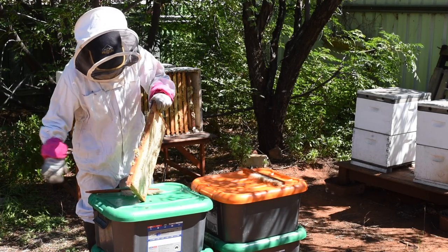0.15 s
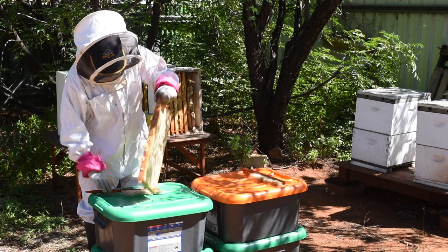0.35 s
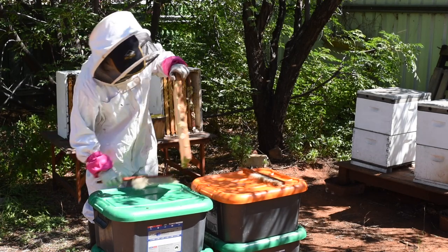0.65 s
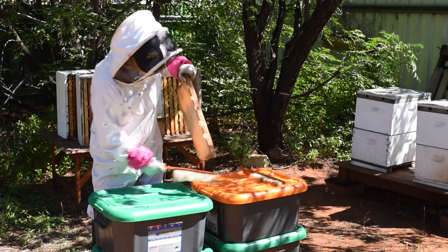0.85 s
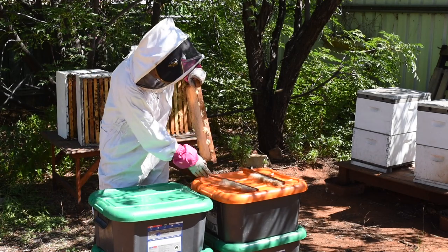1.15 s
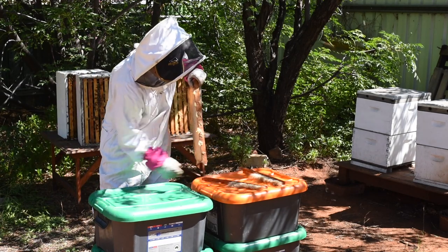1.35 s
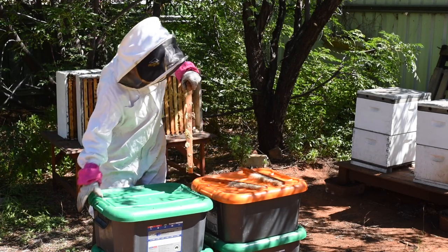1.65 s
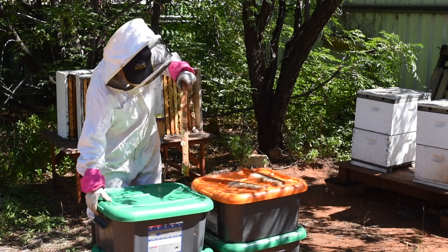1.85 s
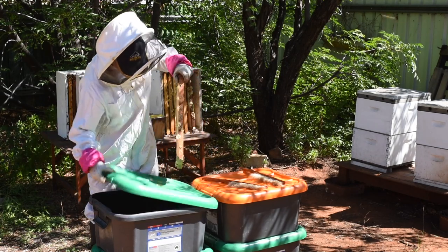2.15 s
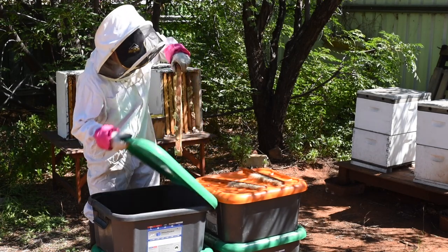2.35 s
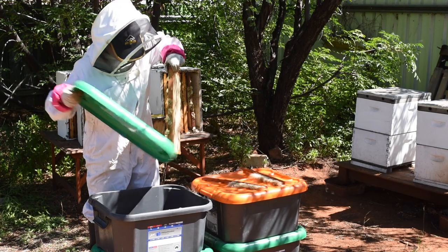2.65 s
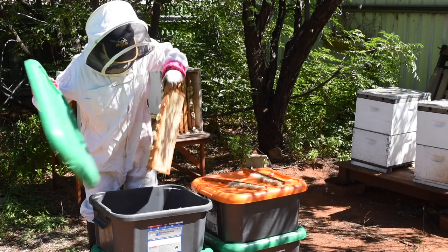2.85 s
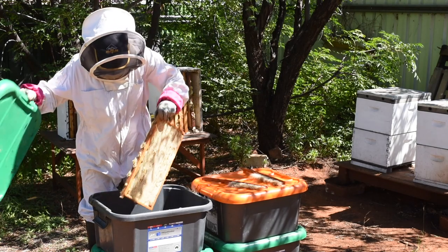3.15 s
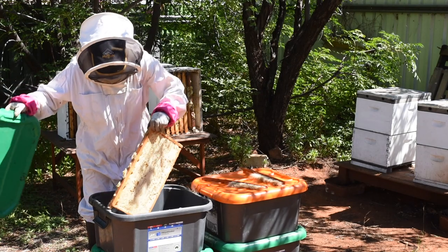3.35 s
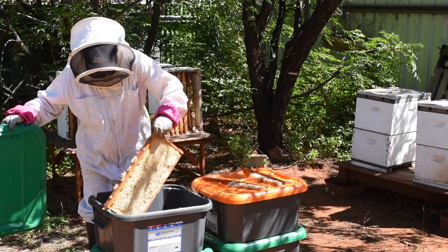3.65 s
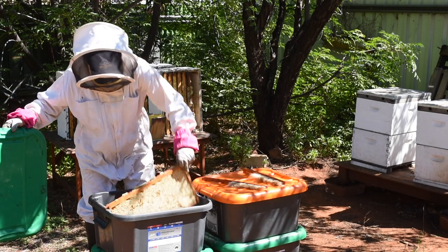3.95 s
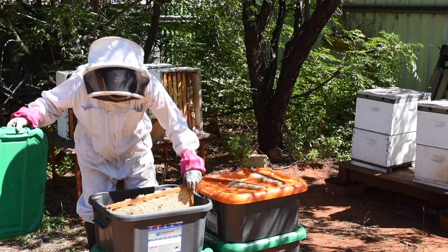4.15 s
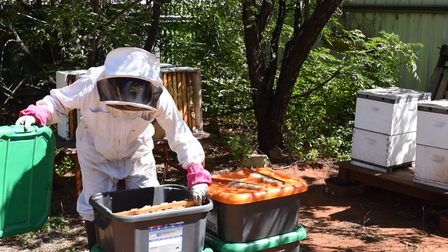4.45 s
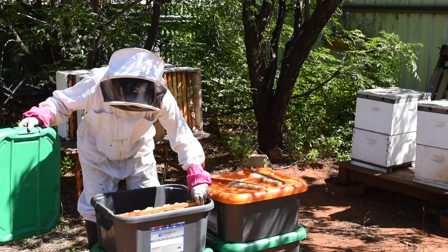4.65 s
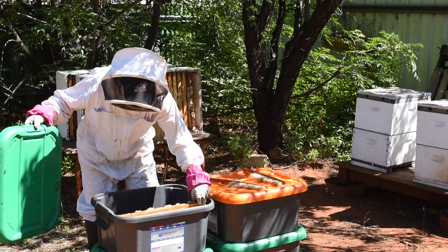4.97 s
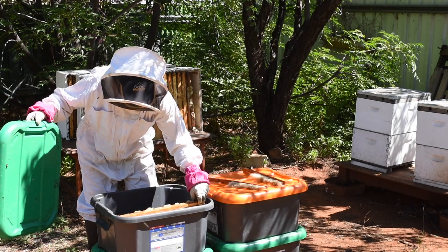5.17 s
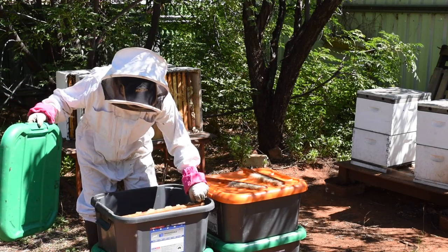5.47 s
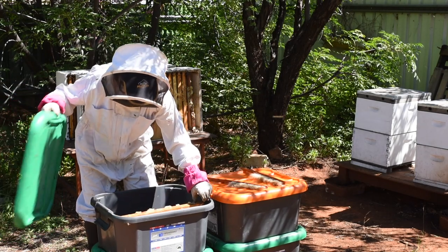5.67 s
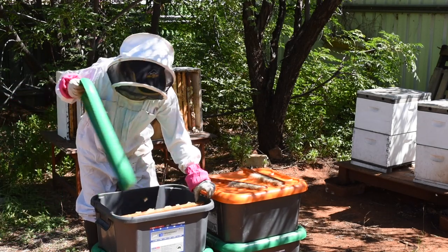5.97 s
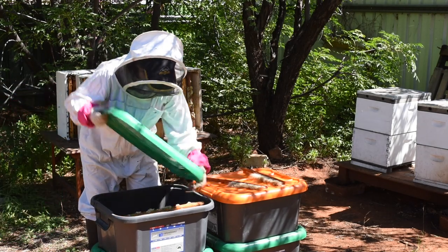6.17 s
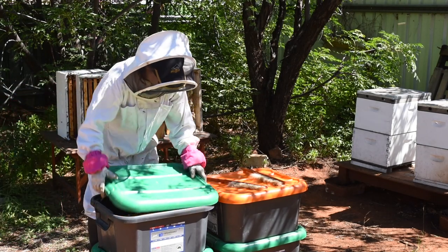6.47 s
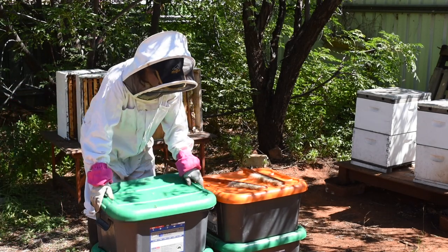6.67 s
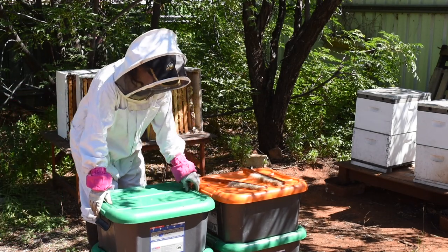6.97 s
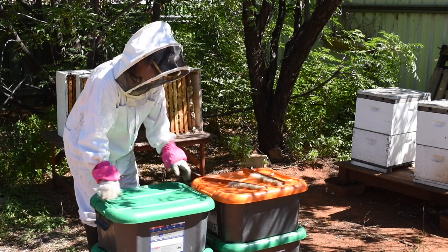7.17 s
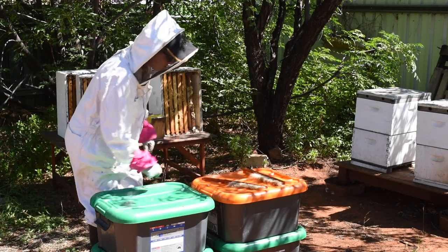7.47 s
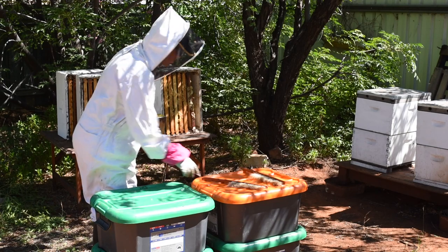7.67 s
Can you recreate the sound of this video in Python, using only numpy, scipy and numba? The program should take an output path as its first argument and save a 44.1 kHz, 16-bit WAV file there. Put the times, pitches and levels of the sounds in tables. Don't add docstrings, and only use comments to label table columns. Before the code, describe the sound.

Bees hum steadily around an outdoor yard while a brush clatters onto a plastic lid, a wooden frame thuds into a tub, and the lid snaps shut.

```python
import sys
import numpy as np
from scipy import signal
from scipy.fft import rfft, irfft, next_fast_len
from scipy.io import wavfile
from scipy.ndimage import uniform_filter1d
from numba import njit

SR = 44100
rng = np.random.default_rng(int(sys.argv[2]) if len(sys.argv) > 2 else 0)


def convert_level_to_amplitude(level_db):
    exponent = np.asarray(level_db, float) / 20
    return 10 ** exponent


def pcm_store(signal):
    levels = np.round(np.clip(np.atleast_2d(signal), -1, 1) * 32767)
    wavfile.write(sys.argv[1], SR, levels.astype(np.int16).T)


N = 344862


def level(x, db):
    return x * convert_level_to_amplitude(db) / np.sqrt(np.mean(x ** 2))


def peak(x, db):
    return x * convert_level_to_amplitude(db) / np.sqrt(uniform_filter1d(x ** 2, 200).max())


def colour(x, table):
    hz, db = np.transpose(table)
    size = next_fast_len(len(x))
    log_hz = np.log(np.arange(size // 2 + 1) * SR / size + 1)
    gain = convert_level_to_amplitude(np.interp(log_hz, np.log(hz), db))
    return irfft(rfft(x, size) * gain, size)[:len(x)]


def band(x, lo_hz, hi_hz):
    return signal.sosfilt(signal.butter(2, [lo_hz, hi_hz], "band", fs=SR, output="sos"), x)


def walk(rate_hz, count):
    knots = rng.standard_normal((count, 200))
    at = np.arange(0, N + 64, 64) / SR * rate_hz
    rows = [np.interp(at, np.arange(200), k) for k in knots]
    return 1.3 * uniform_filter1d(rows, max(int(SR / 64 / rate_hz), 1), axis=1)


def knocks(blows, wall, contact_ms, damp_s, crack_db, crack_per_hardness, rebound_db):
    rebound_s = 0.046
    out = np.zeros(N + SR)
    t = np.arange(SR // 5, dtype=np.float32) / SR
    rank = np.arange(96)[:, None] + rng.uniform(-.4, .4, (96, 1))
    hz = 100 + 9.01 * rank + .38 * rank ** 2
    family = np.digitize(hz[:, 0], (300, 900))
    wall_hz, wall_db = np.transpose(wall)
    mode_db = np.interp(np.log(hz), np.log(wall_hz), wall_db)
    touch = np.exp(-t / contact_ms * 1000)
    fade = np.exp(t * np.float32(-np.log(1000) / damp_s * (hz / 400) ** 0.74))
    gaps = np.diff(np.array(blows)[:, 0], prepend=-1)
    for gap, (start_s, blow_db, heft_db, hard_db) in zip(gaps, blows):
        chance = rng.standard_normal((3, len(hz), 1))
        grit = rng.standard_normal((3, len(t)))
        grit[:2, 0] = 10.3
        rings = np.float32(convert_level_to_amplitude(mode_db + 1.43 * chance[0]) * np.sign(chance[2])) * fade
        rings *= np.sin(np.float32(2 * np.pi * hz * (1 + 0.021 * chance[1])) * t)

        crack = colour(grit[2], wall) * (touch + 0.097 * np.exp(-np.log(1000) * t / (1.2 * damp_s)))
        crack[:2] += 0.57 * np.abs(crack).max() * (gap > rebound_s)
        total_crack_db = blow_db + rebound_db * (gap < rebound_s) + crack_db + crack_per_hardness * hard_db
        sound = peak(band(crack, 2460, 16000), total_crack_db)

        pushes = t * np.exp(-t / 0.00039), grit[0] * touch, grit[1] * touch
        for k, part_db in enumerate((heft_db, 0, hard_db)):
            rung = signal.fftconvolve(rings[family == k].sum(axis=0), pushes[k][:999])
            sound = sound + peak(rung[:len(t)], blow_db + part_db - 5.0)
        i = int(start_s * SR)
        out[i:i + len(t)] += sound
    return out[:N]


# start in seconds, strength in dB, heft in dB (high = mid-panel), hardness in dB (high = edge on edge).
BRUSH_BLOWS = [(0.473, -37, 3.5, -6), (0.894, -43, -18, -14), (1.166, -22, 1, -0.5), (1.181, -28, -8, 3.5),
               (1.212, -36.5, -5, 3), (1.278, -14.5, 2, 6), (1.298, -30, -4, 14.5), (1.341, -24.5, -5, 3),
               (1.379, -30, 3.5, -5), (1.57, -45, -19, -15)]
# frequency in Hz, gain in dB.
FAR_LID_MODES = [(53, -38), (90, -24), (155, -6), (324, -18.5), (649, -5), (880, -9), (1070, -10),
                 (1390, 2), (1800, -9), (3770, -14), (4290, -14.5), (5000, -15.5), (11200, -26),
                 (13600, -49), (16100, -57)]


def brush_on_far_lid():
    return knocks(BRUSH_BLOWS, FAR_LID_MODES, contact_ms=0.42, damp_s=0.13,
                  crack_db=-8, crack_per_hardness=1.64, rebound_db=-14.5)


# start in seconds, strength, heft and hardness in dB.
PRISE_BLOWS = [(2.175, -37, 10, -20), (2.193, -27.5, 6.5, -7), (2.222, -17.5, -4, -6.5),
               (2.239, -20, 4, -10), (2.256, -33, 11, -1), (2.273, -43, -2, 11), (2.32, -47, 12, 2),
               (2.365, -36.5, 11, 2), (2.406, -32.5, 4, 0), (2.423, -23, -14, -12), (2.448, -20.5, -8, -8),
               (2.46, -19, -4, -9), (2.471, -34.5, 11, 12), (2.489, -25.5, 0, -16), (2.536, -43, 4, -6),
               (2.638, -38, -1, -18)]
# frequency in Hz, gain in dB.
LOOSE_LID_MODES = [(53, -41), (90, -17), (210, 0), (372, -12.5), (713, -7), (977, -19), (1190, -13.5),
                   (1840, -21.5), (2030, -25), (3010, -28.5), (10000, -38), (13000, -79), (22000, -120)]


def prise_lid_off():
    return knocks(PRISE_BLOWS, LOOSE_LID_MODES, contact_ms=3.0, damp_s=0.12,
                  crack_db=-19, crack_per_hardness=.8, rebound_db=-1)


# start in seconds, strength, heft and hardness in dB.
GUIDE_BLOWS = [(3.471, -34, 5.5, -20), (3.595, -27.5, -0.5, -12), (3.606, -26.5, -13, -6.5),
               (3.619, -38, 16.5, -16), (3.64, -56, 7, -8), (3.921, -27, 6, -10), (3.94, -47, -3, 15.5),
               (3.961, -50, 19, -17), (3.989, -45, 14, -14)]
# frequency in Hz, gain in dB.
HOLLOW_TUB_MODES = [(53, -36), (90, -16), (124, 3), (174, -6.5), (253, 4.5), (354, -14), (436, -5),
                    (1010, -17), (1420, -18), (2740, -28), (8000, -50), (10400, -76), (17600, -120)]


def guide_frame_in():
    return knocks(GUIDE_BLOWS, HOLLOW_TUB_MODES, contact_ms=2.2, damp_s=0.09,
                  crack_db=-27, crack_per_hardness=1.0, rebound_db=3)


# start in seconds, strength, heft and hardness in dB.
DROP_BLOWS = [(4.535, -9, -11, -3.5), (4.543, -11, 5.5, 4), (4.556, -14.5, 1, -9), (4.565, -11.5, -2, -2.5),
              (4.581, -26, 6, -2), (4.597, -27, -10, 1), (4.613, -10, 0.5, -5), (4.634, -29, 15.5, 3),
              (4.654, -34, 3, -6), (4.697, -30.5, -5, -4), (4.807, -37, -1, 8.5)]
# frequency in Hz, gain in dB.
FRAME_IN_TUB_MODES = [(53, -34), (90, -8), (205, -6.5), (304, -7.5), (369, -9), (558, -10), (861, -10.5),
                      (960, -11), (1220, -12), (1760, -18), (2140, -18.5), (3610, -26), (8410, -29.5),
                      (16100, -48)]


def drop_frame():
    return knocks(DROP_BLOWS, FRAME_IN_TUB_MODES, contact_ms=5.0, damp_s=0.099,
                  crack_db=-15.5, crack_per_hardness=1.25, rebound_db=1.5)


# start in seconds, strength, heft and hardness in dB.
SETTLE_BLOWS = [(5.268, -26.5, 4, 2), (5.278, -26, -9, 2), (5.34, -29.5, -5, -3.5),
                (5.433, -27.5, 2.5, -15), (5.454, -13, -11, -6), (5.472, -27, 2.5, -8),
                (5.751, -36, -1.5, -19), (6.297, -29.5, -28, -1)]
# frequency in Hz, gain in dB.
FRAME_ON_RIM_MODES = [(53, -40), (90, -25), (173, -9), (385, -6), (482, -16), (629, 2), (741, -6),
                      (891, -8), (1820, -18), (4880, -20.5), (6110, -23), (12000, -34), (15600, -71),
                      (22000, -120)]


def settle_frame():
    return knocks(SETTLE_BLOWS, FRAME_ON_RIM_MODES, contact_ms=2.3, damp_s=0.079,
                  crack_db=-11, crack_per_hardness=0.7, rebound_db=-7.5)


# start in seconds, strength, heft and hardness in dB.
PRESS_BLOWS = [(6.565, -13, -8, 1.5), (6.595, -23.5, -2, 1.5), (6.671, -14.5, -9.5, 5),
               (6.757, -24.5, -17, -16), (6.777, -23, -22, -7), (6.899, -27, 1, 2), (7.036, -27.5, 1, -9),
               (7.073, -30.5, 3, -8), (7.477, -38.5, -5, -11)]
# start in seconds, strength, heft and hardness in dB.
SNAP_BLOWS = [
    (6.715, -22, -1, 2),
    (6.808, -18, -1, -0.5),
    (6.872, -12, -2, -4.5),
    (7.052, -22.5, 3.5, -8.5),
]
# frequency in Hz, gain in dB.
SEATED_LID_MODES = [(53, -36), (90, -9.5), (196, 2.5), (482, -13.5), (617, -4), (1120, -2.5), (1490, 4),
                    (1650, -5), (1820, 1), (2150, -3.5), (3040, -4.5), (3510, -21.5), (5510, -6),
                    (6230, -20), (12000, -53), (15600, -81), (22000, -120)]


def press_lid_on():
    thumps = knocks(PRESS_BLOWS, SEATED_LID_MODES, contact_ms=1.6, damp_s=0.12,
                    crack_db=-29, crack_per_hardness=1.0, rebound_db=-1)
    snaps = knocks(SNAP_BLOWS, SEATED_LID_MODES, contact_ms=1.6, damp_s=0.13,
                   crack_db=-13, crack_per_hardness=0.49, rebound_db=0)
    return thumps + snaps


# start, press-in and let-go in seconds, low creak and scuff in dB.
LID_RUBS = [(1.9, 0.091, 0.11, -34, -66), (1.97, 0.08, 0.059, -48, -45.5),
            (2.409, 0.069, 0.034, -28, -29.5), (2.49, 0.013, 0.16, -33, -62), (2.18, 0.06, 0.1, -40, -44.5),
            (4.529, 0.012, 0.13, -34, -27), (6.72, 0.011, 0.055, -40, -41),
            (6.809, 0.0081, 0.037, -27, -31)]


def rubbing():
    slips_per_s, slip_s = 210, 0.0046
    edge_db = -18
    slips = rng.standard_normal(N) * convert_level_to_amplitude(5.1 * np.minimum(rng.exponential(size=N), 4.5))
    catches = (rng.random(N) < slips_per_s / SR) * convert_level_to_amplitude(2.0 * rng.standard_normal(N))
    grip = .45 + signal.lfilter([1], [1, -np.exp(-1 / (slip_s * SR))], catches)
    creak = level(band(slips, 78, 223), -6.0)
    scuff = level(band(slips * grip, 600, 2860), -3.0)
    out = np.zeros(N)
    for start_s, press_s, go_s, creak_db, scuff_db in LID_RUBS:
        since_s = np.arange(N) / SR - start_s
        shape = np.interp(since_s, [0, press_s, press_s + go_s], convert_level_to_amplitude([edge_db, 0, edge_db]), left=0, right=0)
        out += shape * (creak * convert_level_to_amplitude(creak_db) + scuff * convert_level_to_amplitude(scuff_db))
    return out


def yard(x):
    t60_s, wash_db = 0.33, -17
    t = np.arange(SR // 2) / SR
    wash = rng.standard_normal(len(t)) * np.exp(-np.log(1000) * t / t60_s) * (t > .006)
    wash = band(wash, 46, 5600)
    return signal.fftconvolve(x, wash * convert_level_to_amplitude(wash_db) / np.sqrt(np.sum(wash ** 2)))[:N]


@njit
def wingbeats(hz, gain, jitter):
    out = np.zeros(N + 1)
    for bee in range(len(hz)):
        phase, stroke = .5, 0
        for i in range(N):
            step = hz[bee, i >> 6] * jitter[bee, stroke] / SR
            phase += step
            if phase >= 1:
                phase, stroke = phase - 1, stroke + 1
                late = phase / step
                out[i] += gain[bee, i >> 6] * late
                out[i + 1] += gain[bee, i >> 6] * (1 - late)
    return out[:N]


# time in seconds, level in dB.
SWARM_LEVEL = [(0.0, -55), (1.46, -51.5), (2.77, -53), (4.29, -50.5), (5.44, -51.5), (6.62, -48),
               (7.29, -49), (7.82, -46)]
# frequency in Hz, density in dB per Hz.
WING_SPECTRUM = [(88, -24), (150, 2.5), (478, 5.5), (787, 4), (939, 5), (1300, -2), (1690, -6.5),
                 (2950, -14), (5000, -18), (6500, -31), (11000, -120)]


def bees(count):
    beat_hz, beat_spread = 226.6, .075
    own = 1 + beat_spread * rng.standard_normal((count, 1))
    hz = beat_hz * own * (1 + .04 * walk(4.0, count))
    near = convert_level_to_amplitude(3.6 * walk(1.476, count) + 1.3 * walk(7.2, count))
    jitter = 1 + .012 * rng.standard_normal((count, 4000))
    hum = colour(wingbeats(hz, near, jitter), WING_SPECTRUM)
    at_s, db = np.transpose(SWARM_LEVEL)
    return level(hum, 0.76) * convert_level_to_amplitude(np.interp(np.arange(N) / SR, at_s, db))


# frequency in Hz, density in dB per Hz.
AIR_SPECTRUM = [(65, -23), (140, -6.5), (330, -5), (440, 2), (760, -9), (920, -5.5), (1500, -8.5),
                (3100, -17), (4800, -18), (6200, -21), (8600, -18), (10200, -25), (13500, -24),
                (15800, -25.5)]
# frequency in Hz, density in dB per Hz.
NOISE_CEILING = [(15950, -70)]


def air():
    sway = np.repeat(walk(1.9, 1)[0], 64)[:N]
    wash = colour(rng.standard_normal(N), AIR_SPECTRUM + NOISE_CEILING)
    return level(wash, -48) * convert_level_to_amplitude(0.15 * sway)


def breeze():
    gusts = np.repeat(walk(2.72, 1)[0], 64)[:N]
    return level(band(rng.standard_normal(N), 43, 143), -65.0) * convert_level_to_amplitude(3.8 * gusts)


# frequency in Hz, density in dB per Hz.
HISS_SPECTRUM = [(30, -13), (150, -5.5), (700, -10.5), (1500, -19.5), (3000, -11), (6000, -10.5),
                 (15800, -8.5)]


def amplifier_hiss():
    return level(colour(rng.standard_normal(N), HISS_SPECTRUM + NOISE_CEILING), -63)


def scene():
    hands = brush_on_far_lid() + prise_lid_off() + guide_frame_in()
    hands += drop_frame() + settle_frame() + press_lid_on() + rubbing()
    low_hz = 93.7
    far = band(band(hands + yard(hands), low_hz, 19000), low_hz, 12400)
    return np.tile(far + bees(count=48) + air() + breeze(), (2, 1))


def low_pass(x):
    return signal.sosfilt(signal.butter(12, 16290, fs=SR, output="sos"), x)


def record(dry):
    mix = np.clip(dry + np.outer([1, -1], amplifier_hiss()), -1, 1)
    return low_pass(mix)


dry = scene()
out = record(dry)
pcm_store(out)
```